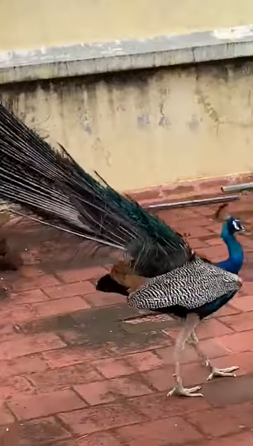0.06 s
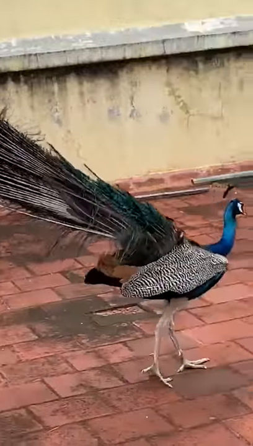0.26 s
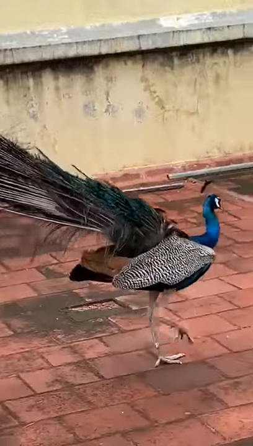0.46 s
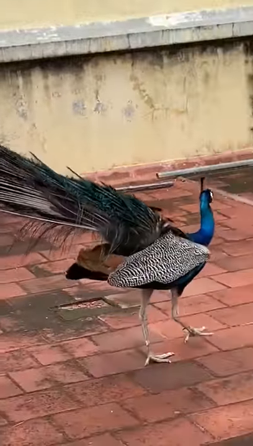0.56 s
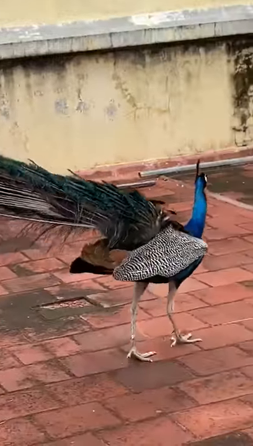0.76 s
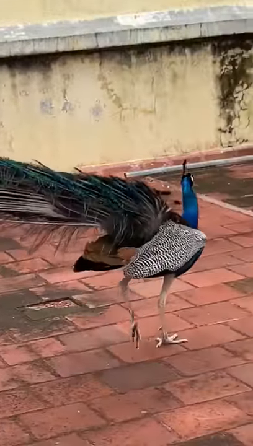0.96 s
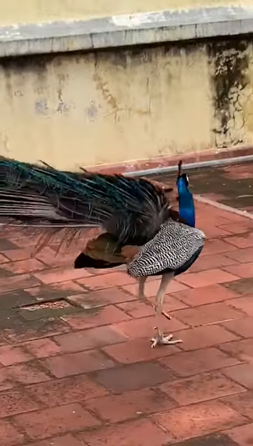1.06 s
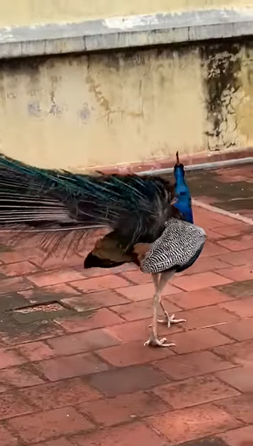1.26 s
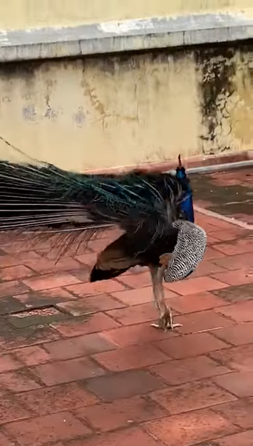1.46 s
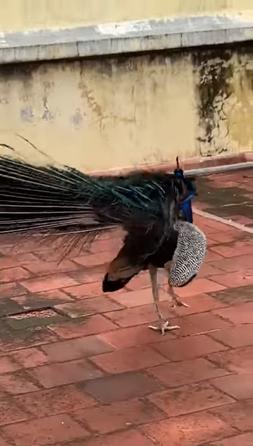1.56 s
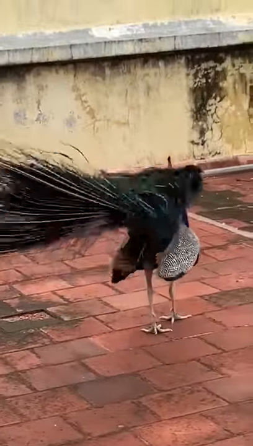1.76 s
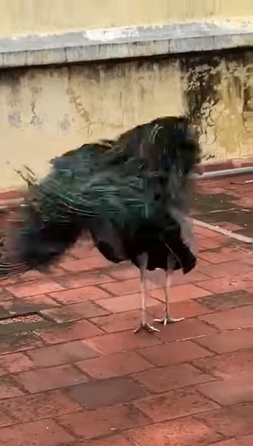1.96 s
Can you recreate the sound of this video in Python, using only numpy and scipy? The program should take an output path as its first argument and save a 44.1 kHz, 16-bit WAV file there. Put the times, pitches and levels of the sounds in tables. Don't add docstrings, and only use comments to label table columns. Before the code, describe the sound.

A peacock's train rattles close by on an open terrace. First, low wind rumble and thuds buffet the microphone, strongest around 0.35-0.75 s, fading by 1.2, with tiny distant peeps, faint hiss and a low machine drone. From 1.3 s dry quill clicks flutter in quick irregular strokes, a claw ticks tile near 1.5, stiff quills snap, and the rustle peaks around 1.8, continuing to 2 s.

```python
import sys
import numpy as np
from scipy import signal
from scipy.fft import rfft, irfft
from scipy.io import wavfile
from scipy.ndimage import uniform_filter1d

SR = 44100
rng = np.random.default_rng(int(sys.argv[2]) if len(sys.argv) > 2 else 0)


def waveform_to_disk(signal):
    frames = np.transpose(np.atleast_2d(signal))
    scaled = np.clip(frames, -1, 1) * 32767
    samples = np.round(scaled).astype(np.int16)
    wavfile.write(sys.argv[1], SR, samples)


def voltage_ratio(decibels):
    exponent = np.asarray(decibels, float) / 20
    return 10 ** exponent


N = 88200

# frequency [Hz], level [dB].
AIR_COLOUR = [(50, -6.5), (100, 7), (300, 13), (700, 4), (2050, -2.5), (3150, -2.8), (3600, -6),
              (11000, -11.5)]
AIR_DB, AIR_PATCH_DB = -58.5, 0.98

# time [s], level [dB].
DRONE_LEVEL = [(0, 11.5), (.2, 2.5), (1.06, 5.5), (1.25, -5), (1.6, -0.8), (1.9, 2.5), (2, 4.5)]
DRONE_HZ, DRONE_DB, THROB_PER_S, THROB_DB = 102, -57.5, 6.6, 5

# start [s], length [s], level [dB], start pitch [Hz], end pitch [Hz].
PEEPS = [(0.53, 0.029, -70.5, 3100, 2980), (0.56, 0.036, -72, 3040, 3170),
         (0.736, 0.043, -70.5, 3020, 3020), (0.89, 0.042, -63.5, 3010, 3070),
         (1.01, 0.14, -76.5, 2900, 2930), (.01, 0.09, -77, 2950, 2950), (.11, 0.11, -82, 2950, 2800),
         (.1, .11, -82.5, 3290, 3000), (.27, 0.13, -78.5, 2880, 2830), (1.063, 0.135, -79, 2360, 2496),
         (1.16, 0.039, -73, 4300, 4260), (.64, .045, -79, 2850, 3300), (0.73, .06, -83, 3030, 3030),
         (1.265, 0.046, -72.5, 2940, 3200)]
PEEP_FUZZ = 0.75

# time [s], level [dB].
GUST_LEVEL = [(0, -55), (.08, -53.5), (.22, -44.5), (.34, -36.5), (.54, -44.5), (.62, -32.5), (.85, -46),
              (1.04, -54.5), (1.18, -56), (1.27, -63), (1.6, -66), (1.74, -54.5), (1.88, -52), (2, -56)]
# frequency [Hz], level [dB].
RUMBLE_COLOUR = [(20, -47), (40, -2.5), (60, -3), (110, -0.5), (200, -16.5), (400, -32.5), (700, -59)]
RUMBLE_DB, LUMP_DB = -1.5, 2

# start [s], puff peak [dB], thud peak [dB].
PUFFS = [(.026, -45.5, -59), (.123, -50.5, -51.5), (0.272, -45, -40.5), (.642, -37, -53),
         (.998, -46.5, -63), (.002, -52.5, -54.5), (0.078, -56, -47), (.245, -51, -34.5),
         (.35, -40.5, -28.5), (0.463, -49, -31.5), (0.661, -43, -32), (0.753, -46, -36.5),
         (1.014, -55, -46), (1.812, -62.5, -57), (1.87, -50, -59.5), (1.959, -55, -55.5),
         (0.165, -59, -33.5), (0.202, -39.5, -31), (0.296, -47, -35.5), (0.336, -34, -27.5),
         (0.375, -22.5, -22.5), (0.427, -31, -25.5), (0.496, -34, -31), (0.534, -28.5, -21),
         (0.575, -47, -27), (0.613, -34.5, -14.5), (0.645, -29.5, -21.5), (0.693, -26.5, -27.5),
         (0.737, -30.5, -35.5), (0.781, -38.5, -53), (0.821, -40, -55.5), (0.853, -31.5, -38),
         (0.872, -40.5, -32.5), (0.935, -42.5, -51.5), (0.961, -33, -49), (1.028, -53, -48),
         (1.049, -50.5, -54), (1.073, -46.5, -50), (1.109, -42, -44.5), (1.146, -42, -40),
         (1.698, -62, -49), (1.734, -50.5, -50), (1.759, -45.5, -50)]
PUFF_END_HZ, PUFF_TOP_HZ, PUFF_FALL_S = 83, 335, 0.006
PUFF_OVER = 0.32
PUFF_RISE_S, PUFF_DIE_S, PUFF_DB, PUFF_WOBBLE_DB = 0.0067, 0.011, -1.6, 1.5
THUD_HZ, THUD_FALL_HZ, THUD_PEAK_S, THUD_DB = 52.9, 38.7, 0.016, 0.5

# start [s], level [dB], pitch [Hz], time to fall 60 dB [s].
CLAW_KNOCK = (1.4892, -42, 1200, .008)

# start [s], level [dB], pitch [Hz].
QUILL_SNAPS = [(1.558, -37, 10750), (1.559, -43.5, 3116), (1.5585, -46.5, 5700), (1.698, -45.5, 3910),
               (1.832, -45, 3600), (1.5863, -51, 5200), (1.584, -47, 2937), (1.5847, -48, 1600),
               (1.607, -47, 3750), (1.661, -45, 2710), (1.7437, -46.5, 1537), (1.745, -47.5, 8300),
               (1.785, -40.5, 5580), (1.795, -46, 9560), (1.799, -43.5, 2456), (1.984, -40, 3050),
               (1.984, -47.5, 1626), (1.472, -50.5, 1128)]
SNAP_CYCLES = 7.9

# time [s], level [dB].
EFFORT = [
    (1.15,-77),
    (1.31,-63),
    (1.44,-59),
    (1.54,-55),
    (1.6,-52),
    (1.675,-55.5),
    (1.72,-51),
    (1.85,-52),
    (1.91,-54),
    (2,-53.5),
]
# start [s], peak [dB], length [s], brightness [dB].
STROKES = [(1.292, -48, 0.0036, -8.5), (1.306, -49.5, 0.004, -11), (1.326, -44.5, 0.003, 0.8),
           (1.333, -49.1, 0.0078, 6), (1.3455, -42.5, 0.0034, 4), (1.3553, -42, 0.0051, 0),
           (1.3754, -43.5, 0.0083, 3.5), (1.382, -46.8, 0.0064, 4), (1.3975, -43.5, 0.0022, -5),
           (1.401, -52.5, 0.0063, -1.0), (1.423, -52, 0.0036, 1.2), (1.434, -54, 0.0026, 16.5),
           (1.465, -44.5, 0.0052, 5), (1.474, -38.3, 0.0054, 6), (1.493, -39, 0.003, -7),
           (1.4982, -38.5, 0.0061, 1.2), (1.507, -39.5, 0.0024, 3.1), (1.515, -44.8, 0.004, 6),
           (1.5181, -47, 0.0043, 3), (1.559, -36, 0.0027, 2), (1.5672, -34.5, 0.0038, -1),
           (1.577, -38.5, 0.0044, 5), (1.5862, -35, 0.0052, 6.5), (1.6092, -38, 0.002, 6),
           (1.6144, -38.5, 0.0094, 3), (1.6328, -34.5, 0.015, 4.5), (1.655, -40, 0.007, -2),
           (1.6714, -52, 0.0043, 0.6), (1.6866, -34.6, 0.017, 3), (1.71, -38, 0.0102, -4.5),
           (1.7424, -33.5, 0.0059, 0.2), (1.753, -34.5, 0.0071, -2), (1.7843, -31, 0.0017, 6),
           (1.7888, -29, 0.006, 1.5), (1.7956, -32, 0.0053, 1.0), (1.8037, -33, 0.0058, -6),
           (1.816, -41.5, 0.0036, -0.6), (1.8214, -36, 0.0033, -2), (1.828, -33.6, 0.0074, 2.5),
           (1.843, -36.5, 0.0068, -4), (1.859, -39.5, 0.0045, 3), (1.8638, -38, 0.0045, -1.5),
           (1.8731, -32.5, 0.003, -4), (1.9217, -36, 0.0056, -1.5), (1.934, -42.5, 0.0058, -2),
           (1.937, -35.5, 0.0036, -5), (1.947, -39, 0.003, -2.1), (1.958, -36.5, 0.017, -1.3),
           (1.976, -40, 0.0043, -4), (1.984, -33.5, 0.0056, 1)]
STROKE_DB, STROKE_RISE = -13.5, 0.82
# frequency [Hz], level [dB].
QUILL_COLOUR = [(200, 1), (700, -8.5), (1150, -1), (1900, -6), (2700, -1.5), (5000, -4.5), (10500, -4),
                (11900, -7.5)]
CLICKS_PER_S, CLICK_SPREAD_DB = 5000, 3.2
SWISH = 0.5
STEADY, STEADY_S = 0.75, 0.0025

# frequency [Hz], likeness [0-1], left-right difference [dB].
PORT_PAIR = [(60, .997, 0), (130, .988, 0), (260, .985, -.3), (700, .6, -3.5), (1100, .8, -3.6),
             (2500, .9, -.2), (3300, .97, 0), (4400, .925, 0), (6500, .985, 0), (8200, .995, 0),
             (9500, .96, 0)]
# frequency [Hz], phase [radians].
PORT_LAG = [(5500, .05), (6120, 1.7), (6500, 2.7), (6900, 3.14), (8150, 3.16), (8530, 4.1), (9130, 5.4),
            (9750, 6.2), (11000, 6.35), (12000, 6.75)]
EDGE_HZ = 11620
WEAK_DB, WEAK_FROM_HZ, WEAK_WAVER_DB, TOP_DB = -10, 1900, 3, -13
HOLE_DB, HOLE_FROM_HZ, LOST_DB = -10, 300, -6.3


def evened(x):
    return x / np.sqrt(np.mean(x ** 2) + 1e-20)


def wander(count, width, passes=2):
    drift = rng.standard_normal(count)
    for _ in range(passes):
        drift = uniform_filter1d(drift, width)
    return evened(drift)


def over_time(points):
    s, value = np.transpose(points)
    return np.interp(np.arange(N) / SR, s, value)


def over_hz(points, hz, axis=1):
    table = np.transpose(points)
    return np.interp(np.log(hz + 1), np.log(table[0] + 1), table[axis])


def coloured(x, points):
    gain = voltage_ratio(over_hz(points, np.fft.rfftfreq(N, 1 / SR)))
    return evened(irfft(rfft(x) * gain, N))


def patchy(x, patch_db, size):
    hz, t, z = signal.stft(x, SR, nperseg=size)
    patches = rng.standard_normal(z.shape[:0:-1]).T
    patches = uniform_filter1d(patches, size=6, axis=0)
    patches = evened(uniform_filter1d(patches, size=8, axis=1))
    return evened(signal.istft(z * voltage_ratio(patch_db * patches), SR, nperseg=size)[1][:, :N])


def add(mix, s, sound):
    part = mix[..., round(s * SR):][..., :len(sound)]
    part += sound[:part.shape[-1]]


def tone(hz, phase=0):
    return np.sin(2 * np.pi * np.cumsum(hz) / SR + phase)


def air():
    noise = patchy(rng.standard_normal((2, N)), AIR_PATCH_DB, size=512)
    return voltage_ratio(AIR_DB) * coloured(noise, AIR_COLOUR)


def far_machine():
    t = np.arange(N) / SR
    drift = wander(N, 2500)
    throb_db = THROB_DB * np.sin(2 * np.pi * THROB_PER_S * (t - 0.1) + 0.25 * drift)
    return voltage_ratio(DRONE_DB + over_time(DRONE_LEVEL) + throb_db) * tone(DRONE_HZ + 5 * drift)


def birds():
    out = np.zeros((2, N))
    for s, length, db, from_hz, to_hz in PEEPS:
        t = np.arange(0, length, 1 / SR)
        waver_hz = (12 + 120 * length) * wander(SR // 2, 400, passes=1)[:len(t)]
        hz_glide = from_hz + (to_hz - from_hz) * t / length
        depth = PEEP_FUZZ * np.minimum(length / 0.073, 1)
        fuzz = 1 + depth * wander(SR // 2, 250, passes=1)[:len(t)]
        swell = np.sqrt(abs(np.sin(np.pi * t / length)))
        add(out, s, voltage_ratio(db + 7.5) * fuzz * swell * tone(hz_glide + waver_hz))
    return out


def wind_rumble():
    lumps_db = LUMP_DB * wander(N, 900)
    noise = coloured(rng.standard_normal((2, N)), RUMBLE_COLOUR)
    return noise * voltage_ratio(over_time(GUST_LEVEL) + RUMBLE_DB + lumps_db)


def wind_puffs():
    out, t = np.zeros((2, N)), np.arange(6000) / SR
    flutter = wander(N + SR, 90)
    puff_shape = (1 - np.exp(-t / PUFF_RISE_S)) ** 2 * np.exp(-t / PUFF_DIE_S)
    puff_shape = puff_shape / puff_shape.max()
    u = t / THUD_PEAK_S
    thud_shape = (u * np.exp(1 - u)) ** 2
    thud_hz = THUD_HZ + THUD_FALL_HZ * np.exp(-u)
    phases = np.pi * rng.uniform(-0.96, 1, (len(PUFFS), 2))
    for (s, puff_db, thud_db), (thud_phase, puff_phase) in zip(PUFFS, phases):
        start = round(s * SR)
        higher = voltage_ratio(PUFF_OVER * np.clip(puff_db - thud_db, -18, 12))
        puff_hz = PUFF_END_HZ + PUFF_TOP_HZ * higher * np.exp(-t / PUFF_FALL_S)
        puff_hz = puff_hz * voltage_ratio(PUFF_WOBBLE_DB * flutter[start + SR // 2:][:len(t)])
        level = voltage_ratio(puff_db + PUFF_DB + 1.23 * flutter[start:][:len(t)])
        add(out, s, level * puff_shape * tone(puff_hz, puff_phase))
        add(out, s, voltage_ratio(thud_db + THUD_DB) * thud_shape * tone(thud_hz, thud_phase))
    return out


def claw():
    s, db, hz, t60 = CLAW_KNOCK
    out, t = np.zeros((2, N)), np.arange(3000) / SR
    shape = voltage_ratio(db - 60 * t / t60) * np.minimum(t / 0.00079, 1)
    ring = np.sin(2 * np.pi * hz * t) + 1.7 * np.sin(2 * np.pi * 0.82 * hz * t)
    add(out, s, shape * ring)
    return out


def quill_snaps():
    out, t = np.zeros((2, N)), np.arange(500) / SR
    jitters = rng.standard_normal((len(QUILL_SNAPS), 500))
    for (s, db, hz), jitter in zip(QUILL_SNAPS, jitters):
        u = t * np.sqrt(hz * 5000) / SNAP_CYCLES
        ring = np.sin(2 * np.pi * hz * t + 0.25 * np.cumsum(jitter))
        add(out, s, voltage_ratio(db) * u * np.exp(1 - u) * ring)
    return out


def shake_power():
    t = np.arange(N) / SR
    fade_in = np.clip((t - EFFORT[0][0]) / 0.17, 0, 1)
    power = voltage_ratio(over_time(EFFORT)) ** 2 * fade_in * np.ones((2, 1))
    for s, db, length, bright_db in STROKES:
        u = np.clip((t - s + 0.0029) / length / STROKE_RISE, -40, 40)
        tilt_db = np.array([[-bright_db], [bright_db]])
        power = power + voltage_ratio(db + STROKE_DB + tilt_db) ** 2 * np.exp(-2.1 * (u - 1) ** 2)
    return power


def train():
    power = shake_power()
    draw = rng.random((2, N))
    size = np.minimum(rng.exponential(1, (2, N)), 4)
    sign_noise, swish = rng.standard_normal((2, 2, N))
    clicks = (draw < CLICKS_PER_S / SR) * voltage_ratio(CLICK_SPREAD_DB * size) * np.sign(sign_noise)
    blend = (1 - SWISH) * evened(clicks) + SWISH * swish
    rustle = patchy(coloured(blend, QUILL_COLOUR), patch_db=1.3, size=128)
    short_power = uniform_filter1d(rustle[0] ** 2, size=round(STEADY_S * SR))
    rustle = evened(rustle / short_power ** (STEADY / 2))
    low = signal.sosfiltfilt(signal.butter(1, 4500, fs=SR, output='sos'), rustle)
    high = rustle - low
    return voltage_ratio(5) * (low * np.sqrt(power[0]) + high * np.sqrt(power[1]))


def scene():
    background = air() + far_machine() + birds() + wind_rumble() + wind_puffs()
    return background + claw() + quill_snaps() + train()


def low_pass(x):
    return signal.sosfilt(signal.butter(12, 12150, fs=SR, output="sos"), x)


def record(dry):
    hz = np.fft.rfftfreq(N, 1 / SR)
    shared, apart = rfft(dry) / np.sqrt(1 + (hz / EDGE_HZ) ** 90)
    same = np.clip(over_hz(PORT_PAIR, hz), 0, 1)
    tilt = voltage_ratio(over_hz(PORT_PAIR, hz, axis=2) / 2)
    lag = np.exp(-1j * np.interp(hz, *np.transpose(PORT_LAG)))
    left = shared * tilt
    right = (same * shared + np.sqrt(1 - same ** 2) * 1j * apart) * lag / tilt
    sum_and_difference = irfft(np.array([left + right, left - right]) / 2, N)

    hz, t, z = signal.stft(sum_and_difference, SR, nperseg=2048)
    bins = abs(z) ** 2
    band = np.add.reduceat(bins, np.arange(0, 1025, 8), axis=1)
    band = np.repeat(band, 8, axis=1)[:, :1025]
    waver = evened(uniform_filter1d(rng.standard_normal((2, 129, len(t))), 2))
    waver_db = WEAK_WAVER_DB * np.repeat(waver, 8, axis=1)[:, :1025]
    bass = (hz < WEAK_FROM_HZ)[:, None]
    keep = (band > voltage_ratio(WEAK_DB + waver_db) ** 2 * band[::-1]) | bass
    treble = band[:1, 470:500].mean(1, keepdims=True)
    keep &= band > voltage_ratio(TOP_DB + waver_db) ** 2 * treble
    keep &= (bins > voltage_ratio(HOLE_DB) ** 2 * band / 8) | (hz < HOLE_FROM_HZ)[:, None]
    keep &= (waver_db > LOST_DB) | bass
    mid, side = signal.istft(z * keep, SR, nperseg=2048)[1][:, :N]
    return low_pass(np.array([mid + side, mid - side]))


dry = scene()
out = record(dry)
waveform_to_disk(out)
```